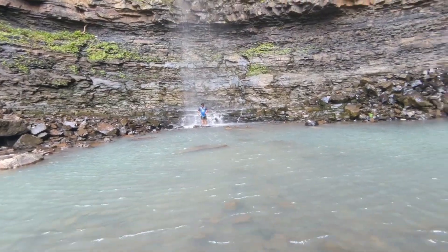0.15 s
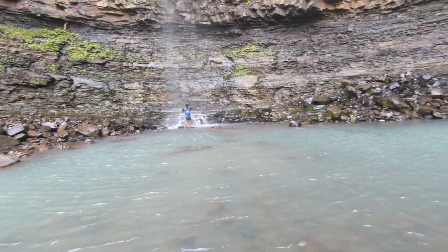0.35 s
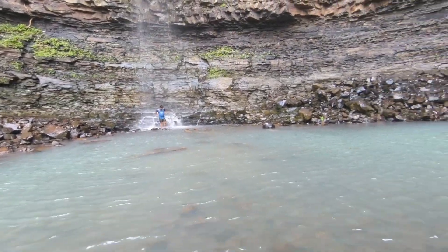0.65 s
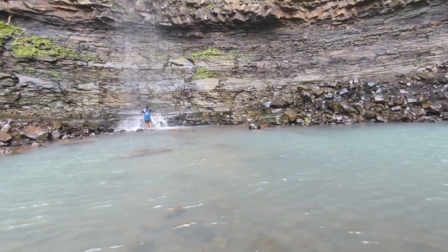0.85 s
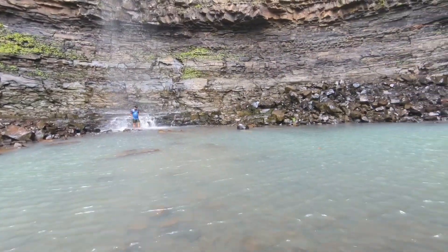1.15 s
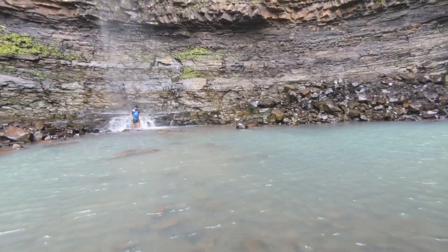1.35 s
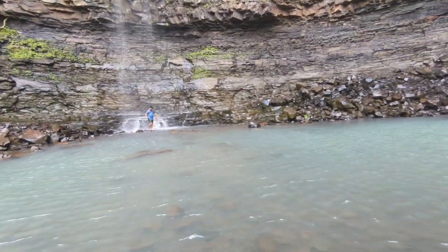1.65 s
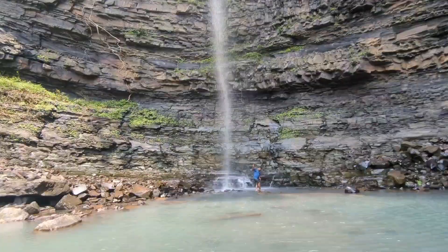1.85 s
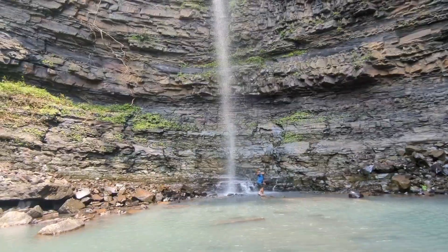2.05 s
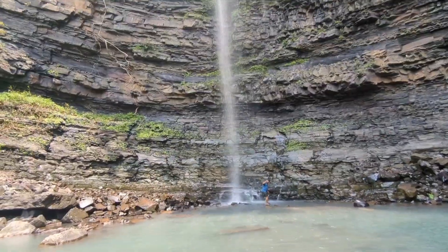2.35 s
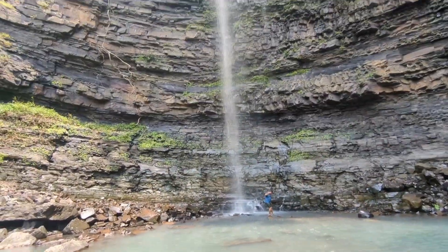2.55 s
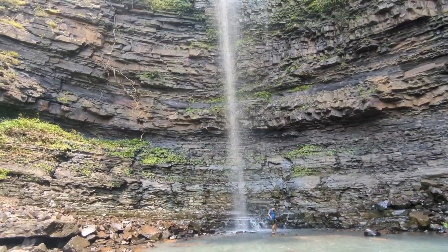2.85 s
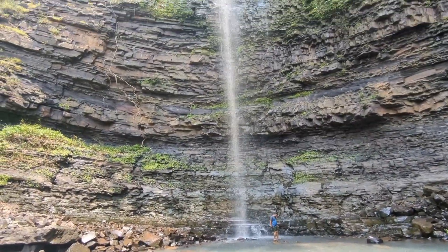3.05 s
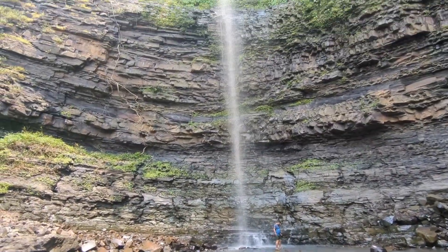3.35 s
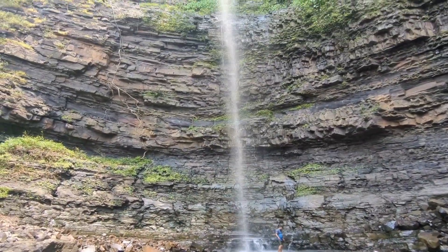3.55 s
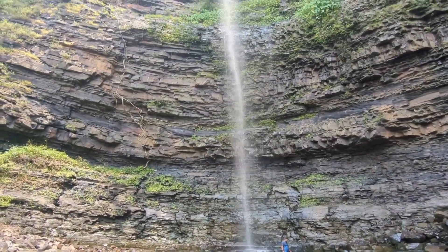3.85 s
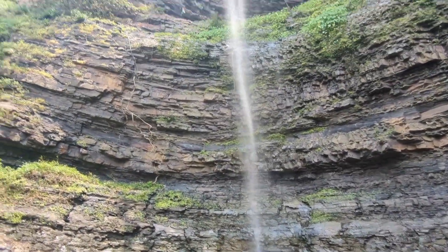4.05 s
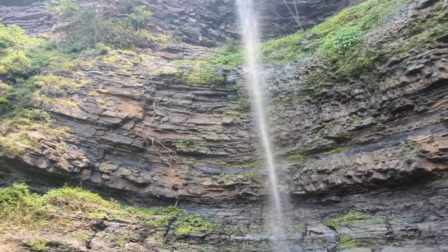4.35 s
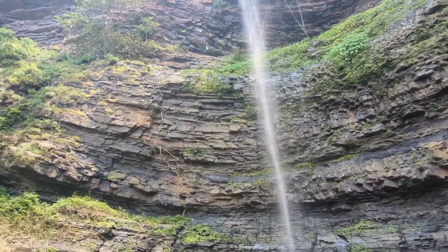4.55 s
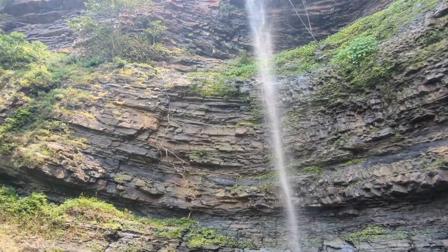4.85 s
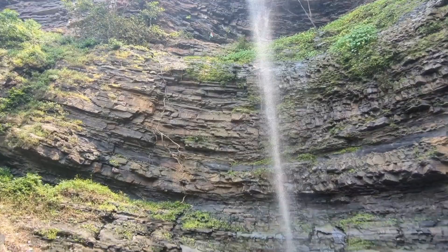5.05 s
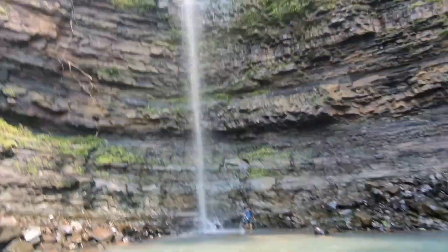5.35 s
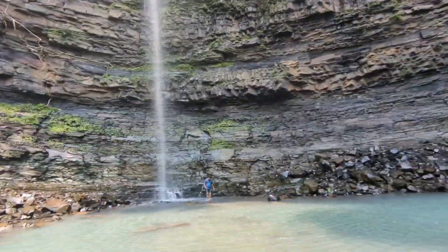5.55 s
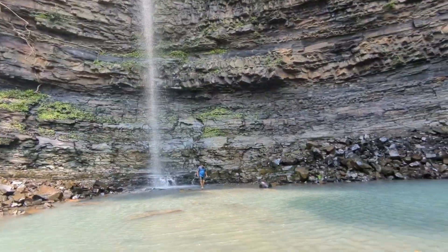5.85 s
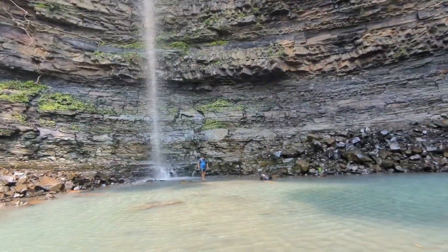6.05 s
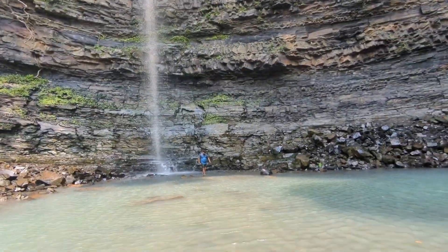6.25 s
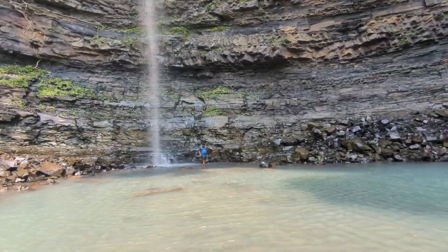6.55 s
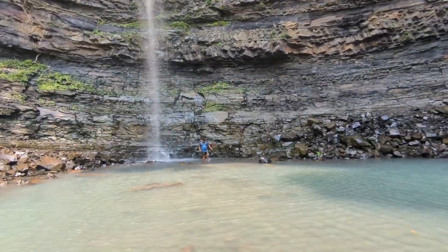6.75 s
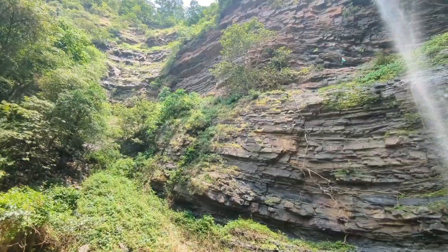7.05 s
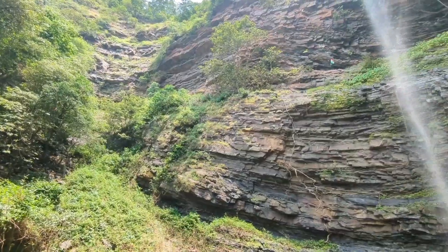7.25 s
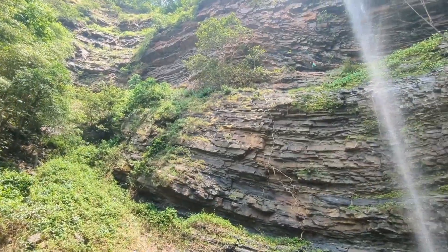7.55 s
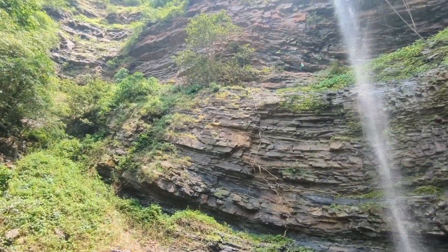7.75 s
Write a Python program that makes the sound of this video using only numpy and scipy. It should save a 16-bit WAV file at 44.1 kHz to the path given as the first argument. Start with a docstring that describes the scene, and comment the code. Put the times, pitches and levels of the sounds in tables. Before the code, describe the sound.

A tall narrow waterfall pours onto rocks at the far side of a pool beneath a cliff, heard at a distance outdoors through a small stereo camera microphone. From 0 to 2 s it is a steady, dense, bright rush of splash and spray, leaning right, with soft low wind bumps near 0.2, 0.5 and 1.4 s. At 2 s the rush abruptly becomes louder and closer, leaning left. Wind rumbles from about 3.2 s, with the strongest thumps and brief rough flutter between 3.4 and 4 s, then weaker gusts near 4.4 s. Around 5.5 s the tone shifts slightly and the splash drifts further left. At 7 s the sound abruptly drops, more centred, and swells over half a second to a softer steady rush, with low wind bumps on the left until about 7.5 s. Faint hollow gulps appear near 0.3, 1.2, 4.1 and 5.3 s.

```python
"""In the hollow of a cliff, a tall narrow waterfall splashes on rocks at the far side of a pool.
The camera takes three views in turn: across the pool, facing the cliff, and up towards the rim.
The fall is filtered noise with short decaying sines for drops, split into low roar, splash and spray.
Wind is coloured noise under gust envelopes at two microphone ports, with single pulses for eddies.
Now and then a faint hollow gulp, a brief gliding tone of blurred pitch, sounds through the rush."""
import sys
import numpy as np
from scipy import signal
from scipy.fft import rfft, irfft, next_fast_len
from scipy.io import wavfile
from scipy.ndimage import uniform_filter1d, map_coordinates

SR = 44100
rng = np.random.default_rng(int(sys.argv[2]) if len(sys.argv) > 2 else 0)


def put_to_file(sound):
    """Save the sound as 16-bit audio at rate SR, in the file named by the first command-line argument."""
    columns = np.atleast_2d(sound).T  # one column per channel
    safe = np.clip(columns, -1, 1)
    whole_steps = np.round(safe * 32767)
    wavfile.write(sys.argv[1], SR, whole_steps.astype(np.int16))


N = 348826
TOP_HZ = 15550  # upper limit of the drop pitches and of the whole sound

# onsets of the second and third view: (time [s])
VIEW_STARTS = [2.014, 6.992]


def amp(db):
    """Level to pressure ratio: 20 dB is a factor of ten."""
    return 10 ** (np.asarray(db) / 20)


def unit(x):
    """Normalisation of mean power: scale to rms 1."""
    return x / np.sqrt(np.mean(x ** 2) + 1e-20)


def along(points, hz, axis=1):
    """Spectral interpolation: one column of a frequency table, read on a logarithmic axis."""
    table = np.transpose(points)
    return np.interp(np.log(hz + 1), np.log(table[0]), table[axis])


def curves(rows):
    """Linear interpolation in time: one value per sample for each column after the time."""
    seconds, *columns = np.transpose(rows)
    return [np.interp(np.arange(N) / SR, seconds, column) for column in columns]


def ramp(start, length):
    """Linear transition from 0 to 1 over length seconds."""
    return np.clip((np.arange(N) / SR - start) / length, 0, 1)


def envelope(hold_start, length, attack, release):
    """Exponential growth up to hold_start, a hold of length seconds, exponential decay."""
    t = np.arange(N) / SR - hold_start
    return np.exp(np.minimum(t, 0) / attack - np.maximum(t - length, 0) / release)


def wobble(rate):
    """Slow random fluctuation: a smooth curve through rate random knots a second."""
    knots = rng.standard_normal(int(N * rate / SR) + 4)
    return map_coordinates(knots, [np.arange(N) * rate / SR])


def filtered(x, response):
    """Linear filtering: the spectrum of x times a response of frequency."""
    padded = next_fast_len(N + 8192)
    spectrum = rfft(x, padded) * response(np.fft.rfftfreq(padded, 1 / SR))
    return irfft(spectrum, padded)[..., :N]


def panned(balance_db):
    """Level-difference panning: left and right gains of constant power, positive to the left."""
    gains = amp(np.array([[1], [-1]]) * balance_db / 2)
    return gains / np.sqrt(np.mean(gains ** 2, axis=0))


def patchy(patchy_db):
    """Random level modulation in time and frequency: two unrelated noises share short, narrow swells."""
    spectra = signal.stft(rng.standard_normal((2, N)), nperseg=512)[2]
    field = rng.standard_normal(spectra.shape[1:])
    field = uniform_filter1d(field, size=3, axis=0)  # over frequency
    field = uniform_filter1d(field, size=7, axis=1)  # over time
    swelling = spectra * amp(patchy_db * unit(field))
    return unit(signal.istft(swelling, nperseg=512)[1][:, :N])


def drops(count, pitch_hz, spread, cycles, size_db):
    """Superposed damped oscillations: each drop bursts on rock or water in a few dying cycles."""
    t = np.arange(128) / SR
    when, side, chance = rng.random((count, 3)).T
    hz = pitch_hz * np.exp(spread * rng.standard_normal((count, 1)))
    hz = np.clip(hz, 900, TOP_HZ)
    size = amp(-size_db * np.log(np.maximum(chance, 0.01)))[:, None]  # few large, many small
    grains = size * np.sqrt(hz) * np.sin(2 * np.pi * hz * t) * np.exp(-hz * t / cycles)
    at = ((when * N).astype(int)[:, None] + np.arange(len(t))).ravel()
    ears = []
    for power_share in (side, 1 - side):
        weighted = grains * np.sqrt(power_share)[:, None]
        ears.append(np.bincount(at, weighted.ravel(), N)[:N])
    return unit(np.array(ears))


def falling_water():
    """Interaural coherence: a dense wash, alike at both ports in the bass, with drops in it."""
    # likeness of the ports, which hear long waves alike: (frequency [Hz], correlation [1])
    likeness = [(250, 1), (500, 0.69), (780, 0.84), (1100, 0.4), (1600, 0.067), (2300, 0.31), (3500, 0.014),
                (12000, .01)]
    # bass of the plunge: (frequency [Hz], gain [dB])
    bass_tone = [(30, -44), (60, -10), (120, -9.5), (200, -2.5), (300, 2.5)]

    def mid_side(hz):
        angle = np.arccos(np.clip(along(likeness, hz), -1, 1)) / 2
        return amp(along(bass_tone, hz)) * [np.cos(angle), np.sin(angle)]

    mid, side = filtered(patchy(patchy_db=1.5), mid_side)
    wash = unit(np.array([mid + side, mid - side]))
    return wash + amp(-14.5) * drops(count=24000, pitch_hz=6080, spread=0.49, cycles=0.94, size_db=2.5)


def view(water, colour, flow, lag_ms):
    """Direction by spectrum, level and delay: the fall reaches the left port lag_ms later."""
    splash_db, spray_db, roar_db, balance_db = flow

    def direction(hz):
        delay = np.exp(np.array([[-1j], [1j]]) * np.pi * hz * lag_ms / 1000)
        return delay * amp([along(colour, hz, axis=1), along(colour, hz, axis=2)])

    heard = filtered(water, direction)
    low = filtered(heard, lambda hz: hz < 1500)
    high = filtered(heard, lambda hz: hz > 8000)
    middle = np.array([unit(ear) for ear in heard - low - high])
    # each band has its own gain offset and slight flicker, both in dB
    roar = unit(low) * amp(roar_db + 3.5 + 0.25 * wobble(16))
    splash = middle * panned(balance_db) * amp(3.5 + 0.09 * wobble(30))
    spray = unit(high) * amp(spray_db + 4.5 + 0.14 * wobble(22))
    return amp(splash_db) * (roar + splash + spray)


def pool_view(water):
    """Stationary source: across the pool, the mean level and balance of the fall stay fixed."""
    # colour of the rush: (frequency [Hz], left gain [dB], right gain [dB])
    pool_colour = [(342, -15, -15.5), (683, -10.5, -9), (830, -14.5, -13.5), (1180, -9.5, -7),
                   (1460, -13, -8.5), (1770, -12.5, -0.5), (2470, -8.5, -1), (4600, -10.5, -11),
                   (6400, -14.5, -2.5), (7860, -11.5, -11), (9660, -5.5, -4.2), (12300, -16.5, -6.5),
                   (14000, -25, -14.5), (15300, -28.1, -12.5)]
    # settings ahead of the band offsets:
    # (overall level [dB], spray level [dB], roar level [dB], splash left-right [dB])
    pool_flow = (-42, -2, -11, -3.5)
    return view(water, pool_colour, pool_flow, lag_ms=-0.14)


def cliff_view(water, splash_gain_db=-0.19, spray_gain_db=0.54, roar_gain_db=0.73):
    """Time-varying directivity: as the camera tips down, colour shifts and the splash drifts left."""
    # colour of the rush: (frequency [Hz], left gain [dB], right gain [dB])
    cliff_colour = [(300, -19.5, -19), (517, -21.5, -20), (760, -15.5, -14.5), (1010, -18.5, -18),
                    (1660, -8.5, -8.5), (2506, 1.5, -7), (3450, -6.5, -13), (5330, -11, -11),
                    (6350, -7.5, -9), (8000, -13, -14), (9660, -12.5, -9.5), (12040, -21, -7),
                    (13900, -30.6, -16.5), (15300, -21, -17)]
    # fall as the camera sweeps the cliff, ahead of the gains and band offsets:
    # (time [s], overall level [dB], spray level [dB], roar level [dB])
    cliff_flow = [(2.08, -38.5, -2.5, -12.5), (2.29, -39, -4.5, -12), (3.78, -38, -4.5, -15),
                  (4.11, -38.5, -5.5, -13), (4.95, -38, -3.5, -12.5), (5.49, -37.5, -6.5, -12),
                  (6.92, -38.5, -6.5, -13)]
    # colour shift with the camera tipped down to the pool: (frequency [Hz], gain [dB])
    tipped_tone = [(450, 1), (750, 1.2), (900, 1.5), (1200, -3.5), (1800, -1.6), (2450, 0.5), (3200, -0.5),
                   (5000, -0.5)]
    tip_start_s, tip_s, drift_s = 5.45, 0.3, 0.62  # onset, colour shift, leftward drift
    left_db, tipped_left_db = 3.1, 6.4  # splash left-right before and after the tip
    splash_db, spray_db, roar_db = curves(cliff_flow)
    balance_db = left_db + (tipped_left_db - left_db) * ramp(tip_start_s, drift_s)
    flow = splash_db + splash_gain_db, spray_db + spray_gain_db, roar_db + roar_gain_db, balance_db
    cliff = view(water, cliff_colour, flow, lag_ms=-0.036)
    colour_change = filtered(cliff, lambda hz: amp(along(tipped_tone, hz)) - 1)
    return cliff + ramp(tip_start_s, tip_s) * colour_change


def rim_view(water):
    """Gain linear in decibels: up towards the rim, the fall starts quieter and swells to its level."""
    # colour of the rush: (frequency [Hz], left gain [dB], right gain [dB])
    rim_colour = [(404, -10, -8.5), (700, -12, -11), (1200, -7.5, -8), (1500, -7.5, -5), (2570, -5.5, -2),
                  (4000, -8.5, -5), (5300, -10, -6), (6400, -9.5, -5), (8100, -13.5, -11.5), (9250, -2, -9),
                  (11300, -11, -10.5), (12700, -13, -15), (14000, -26, -22.8), (15300, -21, -35)]
    # settings ahead of the band offsets:
    # (overall level [dB], spray level [dB], roar level [dB], splash left-right [dB])
    rim_flow = (-45, -4.5, -10, 0)
    duck_db, swell_s = 5, 0.59
    swell = amp(duck_db * (ramp(VIEW_STARTS[1], swell_s) - 1))
    return view(water, rim_colour, rim_flow, lag_ms=0.14) * swell


def waterfall():
    """Amplitude modulation: the stream lands in slight surges; three views follow abruptly."""
    water = falling_water() * amp(0.062 * wobble(30))
    views = [pool_view(water), cliff_view(water), rim_view(water)]
    current = np.searchsorted(VIEW_STARTS, np.arange(N) / SR)
    return np.choose(current, views)


def turbulence(tone, lumps_db):
    """Turbulent pressure fluctuation: lumpy coloured noise, unrelated between the ports."""
    noise = filtered(rng.standard_normal((2, N)), lambda hz: amp(along(tone, hz)))
    return unit(noise * amp(lumps_db * np.array([wobble(35), wobble(35)])))


def wind(rumble_db=2.5, flutter_db=2.0):
    """Power addition of gusts over a faint breeze, shared between rumble and brighter flutter."""
    # gusts on the ports, ahead of the rumble and flutter gains:
    # (hold start [s], hold length [s], level [dB], left-right [dB], flutter share of power [0-1])
    gust_rows = [(.2, 0.072, -51.5, -6, 0.05), (0.523, 0.051, -51.5, -2, 0.02), (.78, 0.45, -62, 5, 0.02),
                 (1.354, 0.21, -53.5, -1, 0), (1.82, 0.14, -60, -6, 0), (3.167, 0.13, -51, 2, 0),
                 (3.42, 0.22, -43, 2.5, 0.2), (3.73, .08, -47.5, -9, 0.35), (3.865, .1, -41.5, -7, 0.74),
                 (4.165, 0.13, -55.5, 6, 0), (4.42, 0.27, -50.5, 3, 0.01), (4.927, .65, -63.5, 1, 0),
                 (7.026, 0.48, -48.5, 23, 0), (7.78, .13, -55, 8, 0)]
    # spectrum of the rumble: (frequency [Hz], gain [dB])
    rumble_tone = [(22, -33), (36, -8), (55, 0), (95, 1.5), (170, -3), (270, -13), (500, -33), (900, -58)]
    # spectrum of the flutter: (frequency [Hz], gain [dB])
    flutter_tone = [(100, -13), (220, -2), (330, 1), (520, -7.5), (750, -13), (1500, -53)]
    attack_s, release_s = 0.039, 0.07  # rumble time constants
    edge_s = 0.0093  # the flutter starts and stops far more sharply
    rumble_power = np.full((2, N), amp(-73) ** 2)  # breeze, ahead of the rumble gain
    flutter_power = np.zeros((2, N))
    for start, length, db, balance_db, share in gust_rows:
        push = amp(db) * panned(balance_db)
        share = np.clip(share, 0, 1)
        rumble_power += (1 - share) * (push * envelope(start, length, attack_s, release_s)) ** 2
        flutter_power += share * (push * envelope(start, length, edge_s, edge_s)) ** 2
    rumble = amp(rumble_db) * np.sqrt(rumble_power) * turbulence(rumble_tone, lumps_db=3.5)
    flutter = amp(flutter_db) * np.sqrt(flutter_power) * turbulence(flutter_tone, lumps_db=4)
    return rumble + flutter


def bumps(cycles=0.37):
    """Pressure pulse of a passing eddy: a sine under a Gaussian, one soft swing each way."""
    # eddies that thump a port, level ahead of a 0.5 dB gain and the pulse shape:
    # (centre time [s], level [dB], pitch [Hz], left-right [dB])
    bump_rows = [(0.239, -32, 116, 18), (0.54, -43, 110, -5), (1.427, -36, 100, -19),
                 (3.435, -27, 278, -18), (3.49, -31, 160, 3), (3.604, -30, 150, 15),
                 (3.788, -31, 200, -1.5), (3.958, -29.5, 332, -6), (4.69, -43, 105, 7),
                 (5.389, -35.5, 86, 20), (5.998, -42, 80.5, -20), (6.899, -38, 85, 9),
                 (7.055, -36, 100, 22), (7.32, -35, 100, 14), (7.408, -35, 140, 18)]
    out = np.zeros((2, N))
    for s, db, hz, balance_db in bump_rows:
        turns = hz * (np.arange(N) / SR - s)
        pulse = np.sin(2 * np.pi * turns) * np.exp(-(turns / cycles) ** 2 / 2)
        out += amp(db + 0.5) * panned(balance_db) * pulse
    return out


def gulps(length=0.023, blur=0.98):
    # hollow gulps, level ahead of a 4 dB gain:
    # (centre time [s], level [dB], pitch [Hz], glide [octaves/s])
    gulp_rows = [(.278, -50.5, 555, 1.5), (1.178, -51, 487, 1.5), (1.335, -54, 530, -3),
                 (4.124, -51, 555, -6), (5.275, -51.5, 485, -1), (5.365, -58, 500, 0),
                 (5.47, -53, 480, 1.5)]
    out = np.zeros(N)
    for s, db, hz, glide in gulp_rows:
        t = np.arange(N) / SR - s
        pitch = hz * 2 ** (glide * np.clip(t, -0.1, 0.1))
        phase = 2 * np.pi * np.cumsum(pitch) / SR + blur * wobble(150)  # blur in radians
        out += amp(db + 4.0) * np.exp(-(t / length) ** 2 / 2) * np.sin(phase)
    return out


def scene():
    """Linear superposition: the fall, with wind, bumps and gulps over it."""
    return waterfall() + wind() + bumps() + gulps()


def record(dry, dip_db=-7):
    """Band limiting: the camera sheds deepest bass and top treble; the level dips as the last view begins."""
    dip = abs(np.arange(N) / SR - VIEW_STARTS[1] - 0.004) < 0.004  # 8 ms long
    dipped = dry * amp(dip_db * dip)
    highpass = signal.butter(2, 38, "highpass", fs=SR, output="sos")
    no_rumble = signal.sosfilt(highpass, dipped)
    return filtered(no_rumble, lambda hz: hz < TOP_HZ)


dry = scene()
out = record(dry)
put_to_file(out)
```